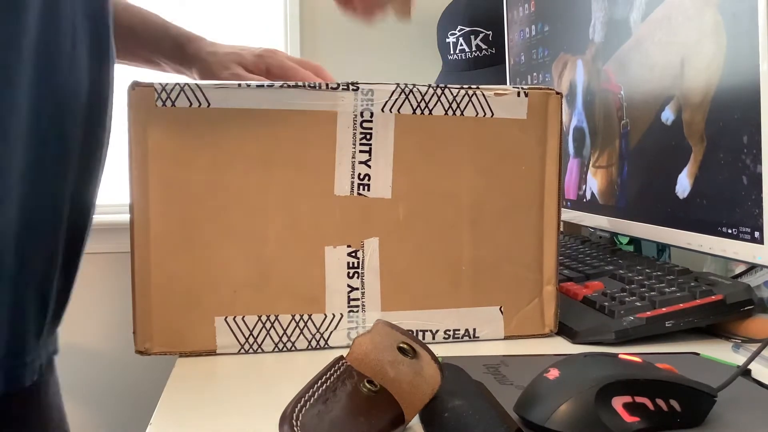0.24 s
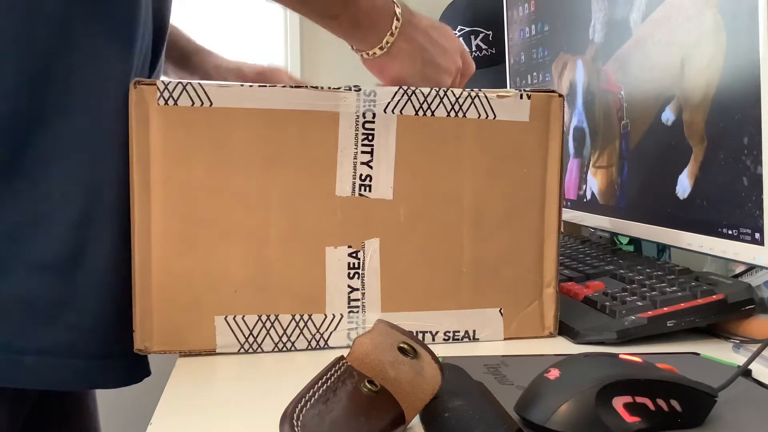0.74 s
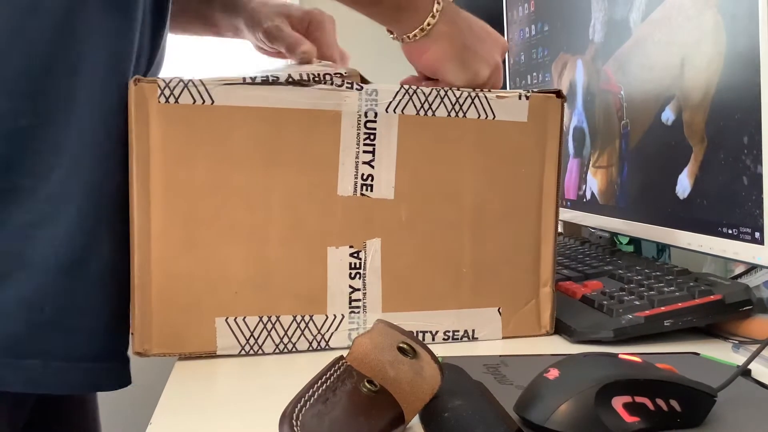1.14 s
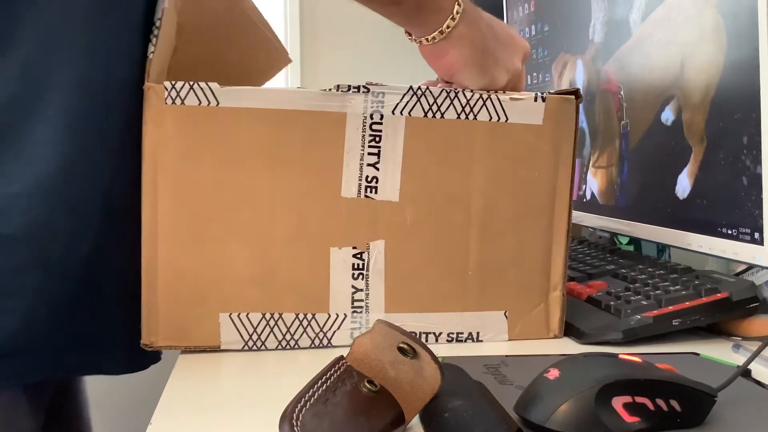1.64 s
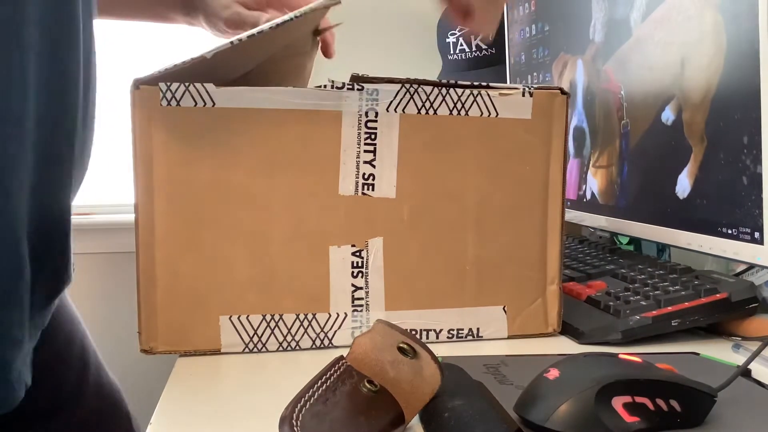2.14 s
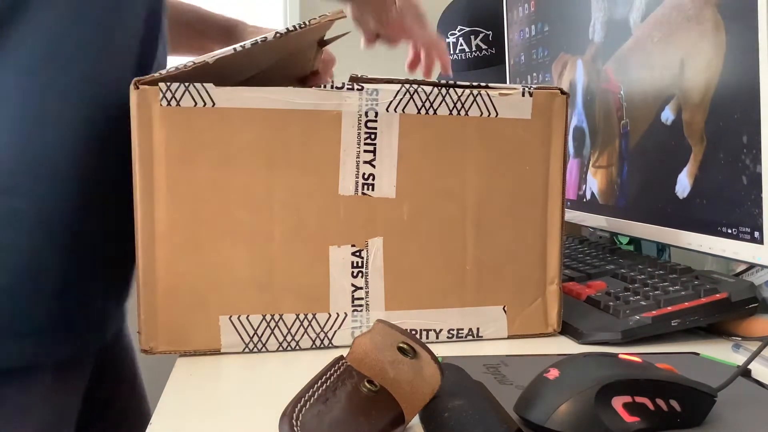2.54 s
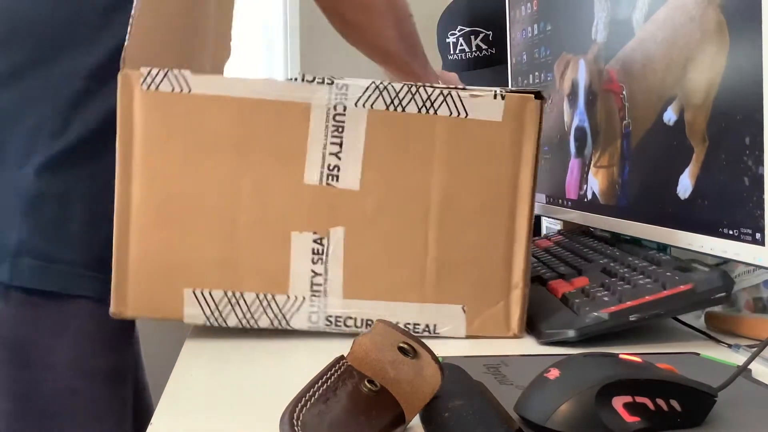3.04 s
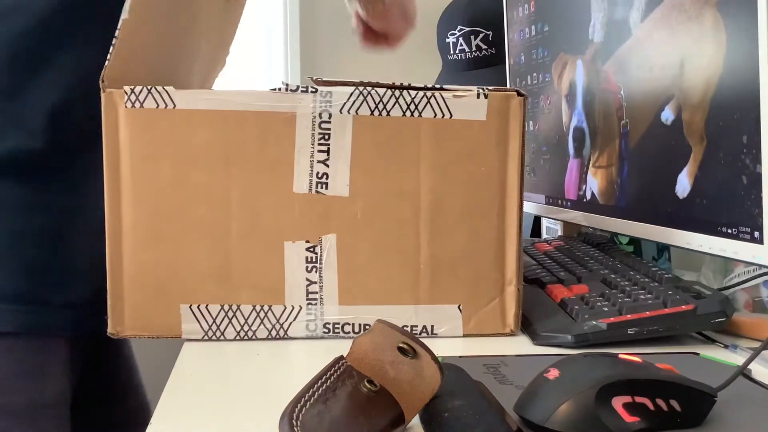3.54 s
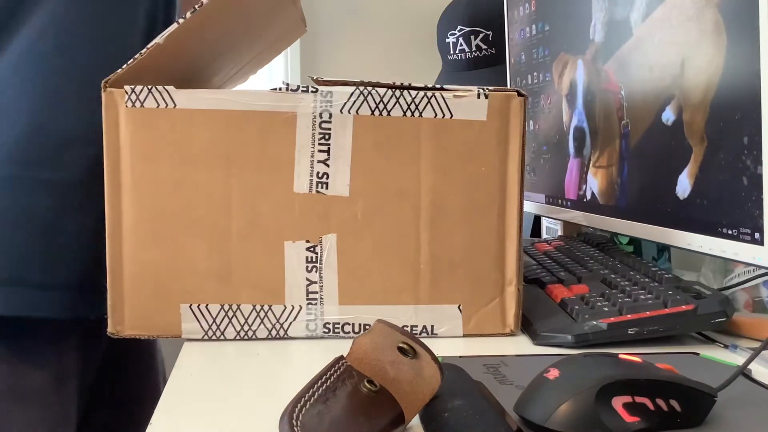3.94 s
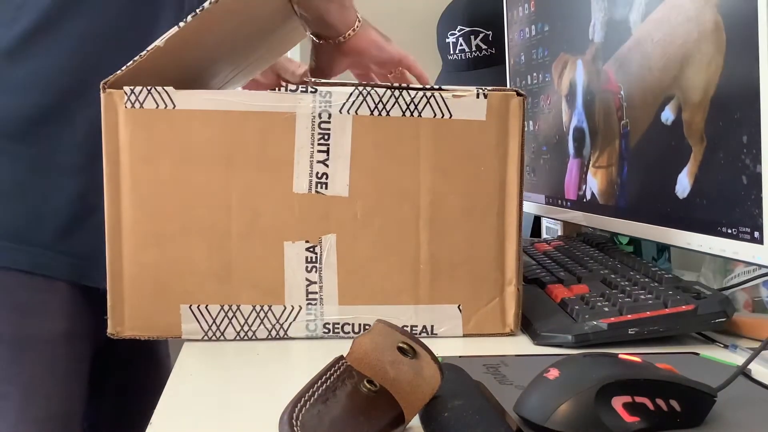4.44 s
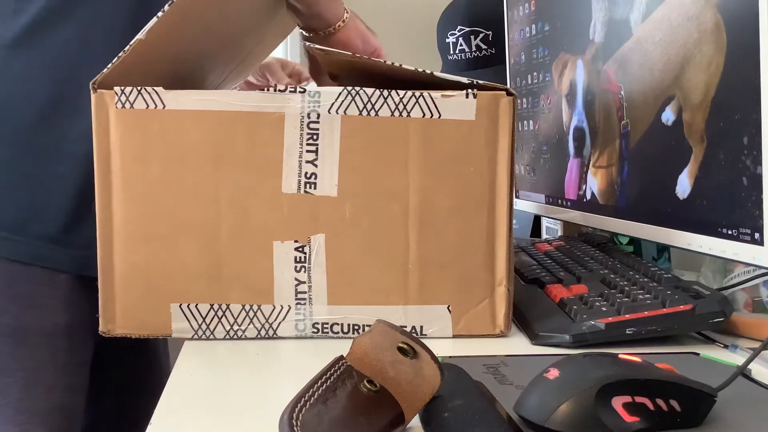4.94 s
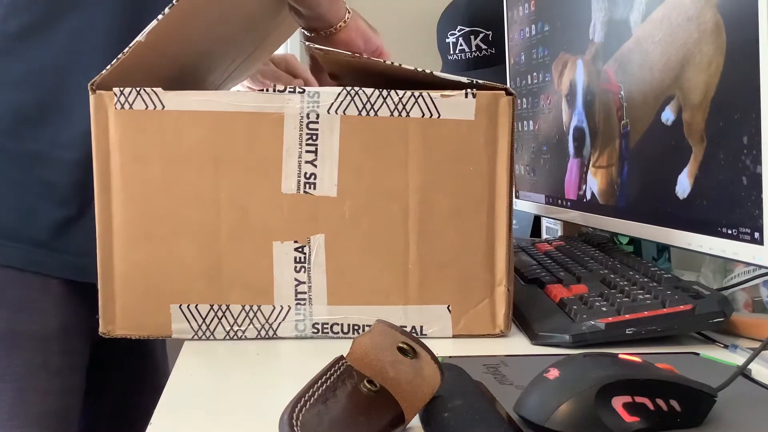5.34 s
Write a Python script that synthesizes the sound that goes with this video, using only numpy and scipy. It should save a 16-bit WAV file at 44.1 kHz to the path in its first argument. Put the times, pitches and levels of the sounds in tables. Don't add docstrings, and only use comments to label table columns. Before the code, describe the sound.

Close to the microphone in a small room, hands work open a taped cardboard box on a desk. A hollow jerk comes early, then a cluster of knocks, then the loudest bright ripping snaps and a tiny squeak. Light ticks follow, another boomy shove near three seconds, a long quiet stretch of faint rubbing, and crisp tape snaps at the end. A soft computer fan hums throughout.

```python
import sys
import numpy as np
from scipy import signal
from scipy.fft import rfft, irfft, next_fast_len
from scipy.io import wavfile
from scipy.ndimage import uniform_filter1d, minimum_filter1d, map_coordinates

SR = 44100
rng = np.random.default_rng(int(sys.argv[2]) if len(sys.argv) > 2 else 0)


def materialize(psi):
    bounded = np.clip(np.atleast_2d(psi).T, -1, 1)
    quanta = np.round(bounded * 32767).astype(np.int16)
    wavfile.write(sys.argv[1], SR, quanta)


def gain_from_db(level_db):
    decades = np.asarray(level_db, float) / 20
    return 10 ** decades


N = 246959
T = np.arange(N) / SR

# frequency in Hz, width in Hz, level in dB.
AIR_MODES = [(188.5, 37, -7), (235.7, 33, -1.5), (321, 67, -8.5)]
# frequency in Hz, width in Hz, level in dB.
PANEL_MODES = [(387.5, 75, -1), (543, 55, 3.5), (631, 54, 4), (831.5, 120, 2.5), (1004, 210, -1),
               (1490, 790, -7.5)]
# frequency in Hz, width in Hz, level in dB.
DESK_MODES = [(62.1, 13, -5), (82, 8.6, -5), (119.5, 23, -1)]


def unit(x):
    return x / np.sqrt(np.mean(x ** 2) + 1e-20)


def along(points, hz):
    f, v = np.transpose(points)
    return np.interp(np.log(hz + 1), np.log(f + 1), v)


def curves(rows):
    s, *columns = np.transpose(rows)
    return [np.interp(T, s, c) for c in columns]


def wobble(rate):
    return map_coordinates(rng.standard_normal(int(N * rate / SR) + 40), [T * rate])


def filtered(x, response):
    m = next_fast_len(len(x) + SR // 2)
    hz = np.fft.rfftfreq(m, 1 / SR)
    return irfft(rfft(x, m) * response(hz), m)[:len(x)]


def resonant(modes):
    def response(f):
        total = 0
        for k, (center, width, db) in enumerate(modes):
            damping = 1j * f * width
            total = total + (-1) ** k * gain_from_db(db) * damping / (center * center - f * f + damping)
        return total
    return response


def narrow(hz, width_hz, count):
    mode = resonant([(hz, width_hz, 0)])
    return unit(filtered(rng.standard_normal(count), lambda f: mode(f) ** 2))


def fan():
    # frequency in Hz, density in dB per Hz.
    air_spectrum = [(18, -45.5), (38, -2.5), (121, -2.5), (239, 0), (404, -6), (499, -5), (780, -10),
                    (937, -22.5), (1040, -15), (3580, -35.5), (12000, -33.5), (16000, -32)]
    # frequency in Hz, width in Hz, rms level in dB.
    whine = [
        (239, 5.3, -66.5),
        (1080, 90, -78),
        (5850, 60, -87),
    ]
    air = unit(filtered(rng.standard_normal(N), lambda f: gain_from_db(along(air_spectrum, f))))
    tones = sum(gain_from_db(db + 0.6 * wobble(2.0)) * narrow(hz, width_hz, count=N) for hz, width_hz, db in whine)
    return gain_from_db(-57 + 0.6 * wobble(2.5)) * air + tones


def room(x):
    # frequency in Hz, t60 in s.
    decay = [(100, 0.4), (1000, .3), (5000, 0.31), (14000, 0.18)]
    hz, t, z = signal.stft(rng.standard_normal(SR // 2), SR, nperseg=256)
    tail = signal.istft(z * gain_from_db(-60 * t / along(decay, hz)[:, None]), SR, nperseg=256)[1]
    delayed = np.pad(x, (250, 0))
    return signal.fftconvolve(delayed, tail / np.linalg.norm(tail))[:N]


def strokes(rows, resting_db, second_db):
    swing_db = 20
    t = T[::16]
    power = gain_from_db(2 * np.array([resting_db, second_db])[:, ::16])
    for s, db, rise, fall, share_db in rows:
        shape = db - swing_db * np.maximum((s - t) / max(rise, 0.002), (t - s) / max(fall, 0.002))
        power = power + gain_from_db(2 * shape) * gain_from_db(2 * np.array([[0], [share_db]]))
    return [np.interp(T, t, 10 * np.log10(p)) for p in power]


def friction(level_db, response, catches, grit_db, clump_db):
    draw = rng.random((2, N))
    caught = draw[0] < catches / SR
    grit = caught * gain_from_db(-grit_db * np.log(draw[1] + 0.11)) * np.sqrt(SR / catches)
    force = unit(rng.standard_normal(N) * (1 + 0.37 * grit) * gain_from_db(clump_db * wobble(60)))
    late = minimum_filter1d(level_db, size=351, origin=175)
    gain = np.sqrt(np.mean(np.abs(response(np.arange(SR // 2))) ** 2))
    return filtered(gain_from_db(late) * force, response) / gain


def patchy(x):
    z = signal.stft(x, nperseg=256)[2]
    field = uniform_filter1d(rng.standard_normal(z.shape), size=4, axis=0)
    field = uniform_filter1d(field, size=5, axis=1)
    return signal.istft(z * gain_from_db(3 * unit(field)), nperseg=256)[1][:N]


def rubbing():
    # frequency in Hz, density in dB per Hz.
    skin = [(2500, -29), (5000, -16.5), (7000, 1.5), (10000, 6), (13000, 4.5), (16000, -2)]
    # frequency in Hz, density in dB per Hz.
    edges = [(700, -32), (1300, -1.5), (2000, -4.5), (3500, -6.5), (5200, -4), (7000, -8.5), (10000, -23.5)]
    # time in s, slide level in dB, weight on the walls in dB over the slide.
    grip = [(0.0, -67, 10), (.4, -59.5, -6), (.64, -49.5, 3.5), (.86, -49, -2), (1.25, -55.5, 4.5),
            (1.62, -59.5, 5), (1.9, -52, 5), (2.1, -67, 6), (2.5, -69.5, 9), (2.75, -55, 2),
            (3.15, -56.5, 2), (3.53, -53.5, -7), (3.67, -66, 2.5), (3.93, -69.5, 5), (4.02, -64, -4),
            (4.6, -62.5, 7.5), (5.15, -77, 12.5), (5.44, -66.5, 7)]
    # peak in s, rustle in dB, rise in s, fall in s, scrape in dB over the rustle.
    rubs = [(.09, -60, 0.062, 0.11, -19), (.28, -50, 0.12, 0.36, -5), (.47, -39.5, 0.047, .3, -3.5),
            (.545, -22.5, 0.039, 0.08, 2), (.913, -29.5, 0.0096, 0.051, 3),
            (.982, -26.5, 0.013, 0.065, -1.5), (1.043, -27.5, 0.006, 0.11, 0.5),
            (1.292, -16, 0.007, 0.024, -3), (1.335, -23.5, 0.046, 0.051, 1.5),
            (1.3652, -15.5, 0.0045, 0.045, -3), (1.384, -14, .006, 0.15, -0.5),
            (1.78, -49.5, 0.17, 0.24, 6), (1.96, -49, 0.31, 0.21, -2), (2.385, -56, 0.13, 0.089, 5),
            (2.63, -48.5, 0.14, 0.27, -7.5), (2.89, -39, 0.27, 0.35, 1.5), (2.95, -19.5, 0.029, 0.15, -1.7),
            (3.23, -36, 0.081, 0.079, -4), (3.285, -51, 0.028, 0.15, 6.5), (3.82, -48, 0.0092, 0.032, -5),
            (4.31, -46.5, 0.081, 0.11, -6), (4.61, -50.5, 0.17, 0.17, -1), (5.53, -29.5, 0.019, 0.058, 1.5),
            (5.58, -27.5, 0.019, 0.019, 4)]
    # peak in s, panel rumble in dB, rise in s, fall in s, boom in dB over the rumble.
    jerks = [(.28, -44.5, 0.08, 0.032, -12), (.39, -54, 0.09, .04, 11), (.445, -36.5, 0.028, 0.12, 5),
             (.51, -43, 0.015, 0.068, 7), (.543, -15, 0.045, 0.039, -12), (.913, -26, 0.0087, 0.056, -2),
             (.89, -36.5, 0.061, 0.044, 3), (1.0, -31.5, 0.035, 0.078, 5),
             (1.0445, -13.5, 0.0037, 0.041, -9), (1.08, -37, 0.054, 0.13, 5),
             (1.31, -16.5, 0.022, 0.041, 3), (1.34, -18, 0.031, 0.031, -1), (1.385, -15.5, 0.04, 0.05, -6),
             (1.432, -21, 0.05, 0.066, 2), (1.51, -29.5, 0.026, 0.11, -3), (1.67, -40.5, 0.068, 0.073, 4.5),
             (1.84, -40, 0.067, 0.041, -13), (2.64, -50, 0.17, 0.12, 7.5), (2.89, -32.5, 0.14, 0.24, 2.5),
             (2.94, -18.5, 0.028, 0.13, -3.5), (3.21, -52.5, 0.043, .04, 15), (3.279, -38, .008, 0.11, -3),
             (4.285, -50, 0.037, 0.12, 4), (5.52, -30.5, 0.019, 0.087, -8), (5.59, -42, 0.1, .06, 11)]
    slide_db, weight_db = curves(grip)
    scrape_db = slide_db - 2 + 0.29 * weight_db
    rumble_db = slide_db + weight_db
    fine_db, coarse_db = strokes(rubs, slide_db, scrape_db)
    panel_db, boom_db = strokes(jerks, rumble_db, rumble_db + 2.5)
    fine = friction(fine_db - 1.5, lambda f: gain_from_db(along(skin, f)), catches=2300, grit_db=-0.5, clump_db=0.5)
    coarse = friction(coarse_db - 3, lambda f: gain_from_db(along(edges, f)), catches=450, grit_db=0.3, clump_db=2.5)
    panels = friction(panel_db - 4, resonant(PANEL_MODES), catches=400, grit_db=1.2, clump_db=2.5)
    boom = friction(boom_db - 7, resonant(DESK_MODES + AIR_MODES), catches=800, grit_db=-0.4, clump_db=1.0)
    return gain_from_db(-1) * patchy(fine + coarse) + panels + boom


def damped_notes(rows, attack_s):
    out, t = np.zeros(N + SR), np.arange(SR // 2) / SR
    for s, hz, t60, db in rows:
        envelope = gain_from_db(db - 60 * t / t60) * (1 - np.exp(-t / attack_s))
        out[round(s * SR):][:len(t)] += envelope * np.sin(2 * np.pi * hz * t)
    return out[:N]


def thumps():
    # start in s, frequency in Hz, t60 in s, level in dB.
    rocking = [(.21, 85, 0.11, -48.5), (.372, 92, 0.11, -39.5), (.37, 155, 0.12, -41.5),
               (.43, 155, 0.1, -38), (.438, 83, .1, -42), (.525, 239, 0.076, -23), (.55, 321, 0.12, -26),
               (.556, 130, 0.099, -29.5), (.56, 186, .1, -34), (.612, 64, 0.13, -37),
               (.912, 230, 0.16, -29), (.978, 280, .08, -32), (1.077, 250, .2, -26), (.57, 80, .12, -36),
               (1.6, 80, .15, -42), (2.4, 70, .15, -56), (2.52, 75, .12, -51), (3.42, 60.3, .2, -50.5),
               (4.62, 74.9, .2, -51.5), (2.805, 230, 0.22, -37.5), (3.37, 248, .08, -45),
               (.995, 128, 0.16, -26.5), (1.245, 110, 0.13, -40), (1.25, 235, 0.13, -36.5),
               (1.305, 287.5, 0.14, -27.5), (1.37, 239, 0.18, -27.5), (1.436, 109, .14, -27),
               (1.535, 121, 0.19, -40), (1.66, 82.5, 0.11, -37), (1.85, 127.3, 0.14, -41),
               (2.6, 239, 0.16, -48), (2.63, 83.4, .13, -42.5), (2.733, 119, .11, -45),
               (2.87, 205, 0.15, -33.5), (2.9415, 229.6, 0.12, -19.5), (2.985, 121, 0.12, -22.5),
               (3.2, 92, 0.067, -38), (3.281, 190, 0.098, -40), (3.72, 95, .1, -54.5),
               (4.275, 239, 0.13, -45.5), (5.572, 85.2, .14, -29)]
    return gain_from_db(5.5) * damped_notes(rocking, attack_s=0.013)


def wall_drums():
    # start in s, frequency in Hz, t60 in s, level in dB.
    springing = [(1.049, 241, 0.18, -14.5), (1.313, 124, 0.2, -16.5), (1.056, 83, .17, -23),
                 (1.11, 63, .25, -34.5), (.995, 63, .18, -27), (2.942, 134, 0.12, -23),
                 (3.03, 130, 0.27, -33.5), (3.295, 126, 0.16, -31.5), (.553, 670, 0.062, -18),
                 (.578, 555, .04, -25), (1.655, 636, .05, -34), (1.333, 660, 0.067, -14.5),
                 (1.388, 650, .05, -14), (1.507, 553, 0.068, -22), (2.94, 560, 0.065, -18),
                 (2.96, 450, 0.046, -23)]
    return damped_notes(springing, attack_s=0.002)


def pings():
    # start in s, frequency in Hz, t60 in s, level in dB.
    clicks = [(.54, 2790, 0.05, -31), (.543, 5760, .03, -28), (.54, 1620, 0.068, -26.5),
              (.55, 776, 0.025, -11.5), (.92, 855, 0.05, -24), (.9815, 2300, .03, -32.5),
              (.9885, 897, 0.019, -22), (1.0, 620, .02, -28.5), (1.022, 650, .03, -28),
              (1.063, 5800, .01, -26), (1.0495, 770, 0.018, -15.5), (1.062, 900, .03, -21.5),
              (1.3315, 5170, 0.017, -15.5), (1.3315, 2300, .02, -28), (1.3715, 7520, .012, -13.5),
              (1.3715, 14000, .008, -12), (1.381, 1500, 0.0088, -16.5), (1.3895, 5100, .008, -8),
              (1.4, 5120, .008, -7.5), (1.411, 5000, .008, -9.5), (1.429, 1390, .012, -16),
              (1.371, 5340, .015, -24.5), (1.371, 1390, .02, -19.5), (1.834, 1048, 0.049, -37),
              (2.776, 1490, 0.015, -33), (2.783, 2900, .012, -35.5), (2.775, 2410, .015, -42.5),
              (2.94, 2030, .02, -25.5), (2.952, 706, 0.021, -19), (2.992, 1114, 0.025, -25),
              (2.841, 1850, .03, -40), (2.92, 2100, .015, -26), (3.247, 1490, .02, -36),
              (3.285, 1066, .03, -33.5), (3.3, 1900, .02, -38), (3.354, 1300, 0.043, -43),
              (4.286, 628, 0.055, -45), (4.298, 400, 0.038, -44.5), (5.523, 2350, 0.02, -20),
              (5.526, 1040, 0.056, -32), (5.537, 3600, .015, -26), (5.576, 900, 0.033, -34)]
    return gain_from_db(3.5) * damped_notes(clicks, attack_s=0.00083)


def knocks():
    # start in s, peak in dB, enclosed air in dB, desk thump in dB.
    blows = [(0.266, -54, -14, -19), (0.436, -22, -7, -28), (0.548, -8.5, -14, -35),
             (0.921, -20, -8.5, -39), (0.981, -16, -13.5, -20), (1.049, -8.5, -29, -37),
             (1.313, -11.5, -15, -13), (1.334, -12.5, -12.5, -12), (1.391, -15, -15, -21.5),
             (1.51, -23, -27, -12.5), (1.6545, -25.5, -16, -14), (1.833, -38, -20.5, 4),
             (1.915, -33, -3.5, -11), (2.318, -36, -20, -13), (2.733, -29, -5, -10), (2.842, -34, -3, -12),
             (2.9405, -13, -21, -19), (2.959, -10.5, -14, -18), (2.993, -16, -15, -22),
             (3.249, -31, -19, -21), (3.283, -28, -10.5, -17), (3.303, -36.5, -13, -10),
             (4.282, -38, -14, -19.5), (5.482, -27, -4.5, -17), (5.583, -26, -20, 1)]
    panels, air, desk = resonant(PANEL_MODES), resonant(AIR_MODES), resonant(DESK_MODES)
    out, t = np.zeros(N + SR), np.arange(SR // 3) / SR
    for s, db, air_db, desk_db in blows:
        push = 5 * gain_from_db(-60 * t / 0.003) + rng.standard_normal(len(t)) * gain_from_db(-60 * t / 0.074)

        def struck(f):
            body = panels(f) + gain_from_db(air_db + 18.5) * air(f) + gain_from_db(desk_db + 17) * desk(f)
            return body / (1 + 1j * f / 1800) ** 2

        sound = filtered(push, struck)
        out[round(s * SR):][:len(t)] += gain_from_db(db - 4.5) * (1 - t / t[-1]) * sound / np.abs(sound).max()
    return out[:N]


def squeaks():
    # start in s, length in s, frequency in Hz, width in Hz, level in dB.
    slips = [(1.387, .022, 5200, 400, -17.5), (1.408, 0.016, 5100, 500, -22),
             (1.397, 0.019, 1885, 200, -19), (1.432, 0.03, 4700, 340, -26.5),
             (1.422, 0.019, 2800, 280, -22.5), (1.408, 0.013, 4250, 300, -23),
             (1.392, .018, 6700, 460, -23.5), (1.452, 0.016, 2800, 270, -29),
             (3.285, 0.044, 1500, 1200, -43), (3.243, 0.032, 840, 470, -41.5),
             (1.424, 0.012, 1390, 120, -17), (2.803, 0.007, 1460, 220, -37), (2.888, 0.033, 2730, 260, -30),
             (1.398, 0.045, 10300, 600, -22), (1.4, .035, 8500, 500, -24), (1.4, .025, 12000, 500, -25.5),
             (1.72, 0.077, 11000, 2500, -49), (4.612, 0.038, 4800, 2700, -54),
             (2.903, 0.024, 5400, 430, -37), (2.938, 0.023, 5370, 592, -32),
             (2.96, 0.035, 5600, 450, -29.5), (2.364, 0.043, 1430, 1200, -52),
             (3.284, 0.028, 2200, 1300, -42), (5.536, 0.0088, 2200, 620, -23.5),
             (2.955, 0.022, 3170, 350, -32), (1.752, 0.043, 3400, 1400, -44), (5.405, .05, 4600, 1900, -61),
             (5.32, 0.028, 4500, 1200, -64.5)]
    steady = 0.6
    count = 4000
    out = np.zeros(N + SR)
    for s, length, hz, width_hz, db in slips:
        phase = np.clip(np.arange(count) / (length * SR), 0, 1)
        swell = np.sin(np.pi * phase).clip(0) ** 0.45
        tone = narrow(hz, width_hz, count)
        evened = tone / (np.abs(signal.hilbert(tone)) + 0.092) ** steady
        out[round(s * SR):][:count] += gain_from_db(db) * swell * evened
    return out[:N]


def snaps(rows, t60):
    out, t = np.zeros(N + SR), np.arange(SR // 10) / SR
    spray = resonant([(11500, 9400, 0.00033)])
    onset = 0.0006
    for s, db, hz, bright_db in rows:
        fall = gain_from_db(-60 * (t - onset) / t60) + 0.65 * gain_from_db(-60 * (t - onset) / 0.0028)
        burst = rng.standard_normal(len(t)) * fall * (t > onset)
        burst[27] = 5.3
        tint = resonant([(hz, 0.55 * hz, 5)])
        sound = filtered(burst, lambda f: tint(f) ** 1.21 + gain_from_db(bright_db + 12) * spray(f))
        out[round(s * SR):][:len(t)] += gain_from_db(db) * sound / np.abs(sound).max()
    return out[:N]


def fibres():
    # start in s, peak in dB, center in Hz, brightness in dB.
    ticks = [(.2093, -39, 5630, -12), (.2674, -28, 5830, -4), (.7415, -40, 3500, -20),
             (1.7245, -27.5, 3170, -32), (1.8017, -22, 14500, -22), (1.8334, -33.5, 2000, -30),
             (1.909, -37, 1890, -22), (1.9511, -23, 13000, -8), (2.133, -44, 897, -30),
             (2.2836, -42, 5750, -8.5), (2.3656, -41, 2000, -27), (2.3908, -42, 2820, -18),
             (2.6365, -28.5, 4130, -28), (2.7329, -38, 6060, -13), (3.2716, -29.5, 3800, -26),
             (3.3522, -37, 5600, -26), (3.5328, -36.5, 7500, -10), (3.5767, -37.5, 3670, -20),
             (3.7185, -42.5, 3020, -23), (3.8176, -32.5, 3530, -15), (4.1283, -47.5, 2794, -12.5),
             (4.3226, -40.5, 6670, -11.5), (4.6117, -28.5, 3860, -19), (4.849, -39, 2400, -32),
             (5.3247, -49, 4700, -15), (5.4826, -42, 1810, -23.5)]
    return snaps(ticks, t60=0.022)


def crackle():
    # start in s, peak in dB, center in Hz.
    strands = [(0.2142, -39.5, 10600), (0.218, -37, 5900), (0.3797, -42, 6200), (0.4548, -38, 8200),
               (0.508, -30, 10500), (0.5461, -12, 2800), (0.7953, -38, 10600), (0.7235, -35, 3000),
               (0.927, -24.5, 2920), (0.9808, -13, 5100), (0.9891, -19.5, 8100), (1.2556, -46, 10200),
               (1.3026, 1, 10300), (1.3239, -19, 9900), (1.3326, -6, 5100), (1.3395, -17.5, 7800),
               (1.3502, -18, 8500), (1.3714, -7.5, 7500), (1.42, -6.5, 4800), (1.4971, -21, 8500),
               (1.7391, -28, 3200), (1.752, -28, 3000), (1.7799, -36, 3800), (1.9695, -38, 5800),
               (1.9998, -40, 5500), (2.0458, -47, 2400), (2.7362, -34, 12100), (2.8575, -28, 7500),
               (2.8864, -25, 2900), (2.8902, -25, 2500), (2.8984, -22, 2500), (2.9048, -21, 2600),
               (2.9134, -24, 3000), (2.9199, -24, 2400), (2.9435, -20, 5300), (2.9744, -12, 12900),
               (2.9906, -18, 5600), (3.0492, -20, 10000), (3.0605, -21, 11900), (3.2138, -32, 11500),
               (3.2188, -22.5, 3940), (3.3034, -32, 2100), (3.3555, -37, 2200), (4.5949, -37, 3900),
               (4.6188, -32, 4900), (5.497, -39, 4900), (5.5086, -46, 4700), (5.53, -16, 5000),
               (5.5377, -13, 2500), (5.5551, -20, 5500), (5.576, -14, 5530)]
    bright_db = -22.5
    return snaps([(s, db - 2.5, hz, bright_db) for s, db, hz in strands], t60=0.009)


def tape():
    # start in s, peak in dB, center in Hz, brightness in dB.
    releases = [(.4598, -26.5, 5700, -19), (.5296, -28, 2800, -12), (.9189, -15.5, 2720, -18),
                (.9809, -12, 5540, -13), (.9904, -31, 5310, -7.5), (1.0478, -24, 5200, -16),
                (1.3024, -12, 10500, -6), (1.3327, -11, 5060, -24), (1.3711, -8, 2680, -16),
                (1.388, -6.5, 5160, -21), (1.3971, -4, 5270, -19), (1.4029, 1, 4990, -19),
                (1.739, -26.5, 3200, -32), (1.7523, -25.5, 2890, -33.5), (2.7752, -28, 2600, -24),
                (2.8608, -22, 4200, -22), (2.8972, -20, 2680, -26), (2.9395, -23, 2010, -22),
                (3.2191, -26, 3940, -18), (3.2495, -27, 5200, -22), (3.2832, -23.5, 4200, -23.5),
                (5.4953, -37, 4707, -3), (5.5224, -8, 4140, -19), (5.5294, -14.5, 4800, -16),
                (5.5374, -9.5, 4770, -10), (5.5454, -15, 4750, -19), (5.5754, -12, 5150, -9),
                (5.5834, -18.5, 5300, -7)]
    return snaps(releases, t60=0.019)


def scene():
    sudden = tape() + knocks()
    notes = wall_drums() + thumps() + pings()
    slide = rubbing() + squeaks() + fibres() + crackle()
    echo = room(gain_from_db(-6.5) * sudden + gain_from_db(-12) * notes + gain_from_db(-10) * slide)
    return (sudden + notes + slide + echo + fan())[None]


def low_pass(x):
    return signal.sosfilt(signal.butter(12, 16850, fs=SR, output="sos"), x)


def record(dry):
    x = dry / (1 + np.abs(dry / 0.95) ** 4) ** (1 / 4)
    top_hz, bass_hz = 15900, 47

    def microphone(f):
        g = f + 1e-3
        bass_cut = (g * g / (g * g - bass_hz ** 2 - 1j * g * 50)) ** 2
        return bass_cut * np.clip((top_hz - f) / 250, 3e-3, 1)

    return low_pass(filtered(x[0], microphone)[None])


dry = scene()
out = record(dry)
materialize(out)
```